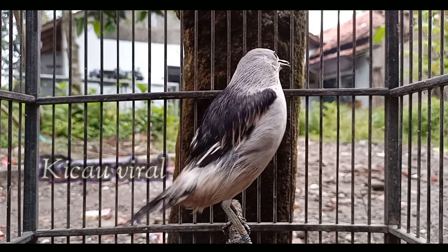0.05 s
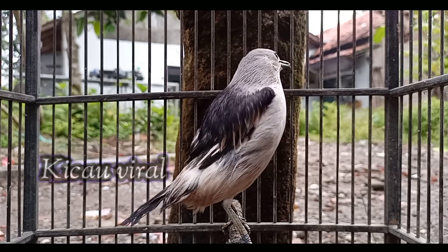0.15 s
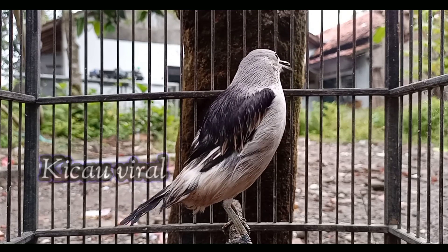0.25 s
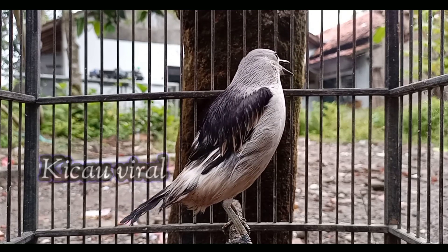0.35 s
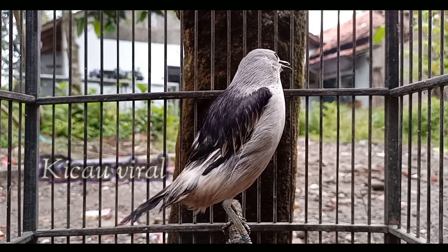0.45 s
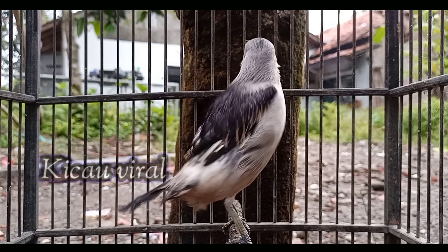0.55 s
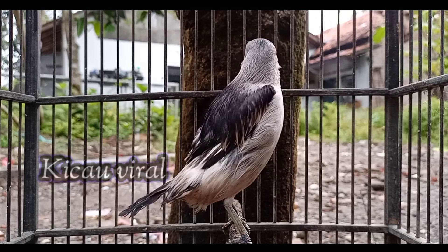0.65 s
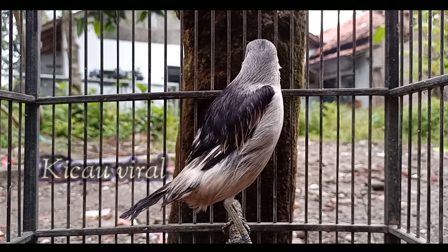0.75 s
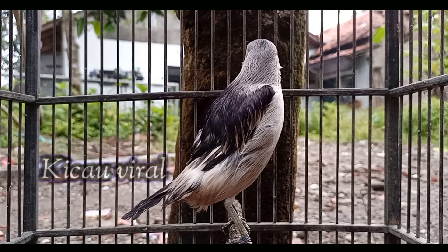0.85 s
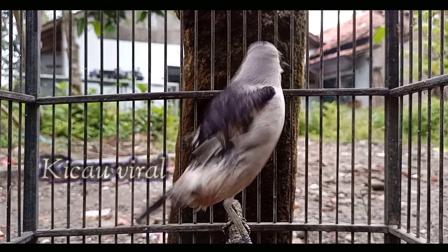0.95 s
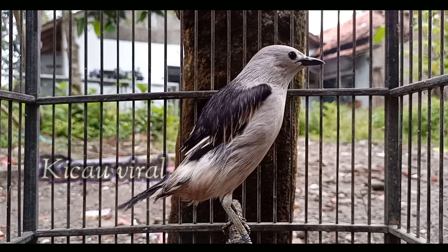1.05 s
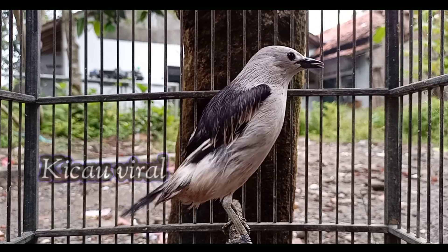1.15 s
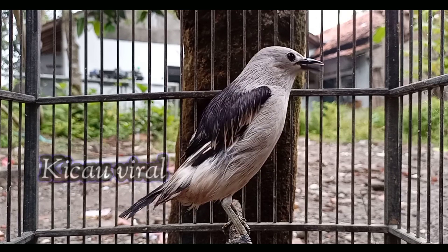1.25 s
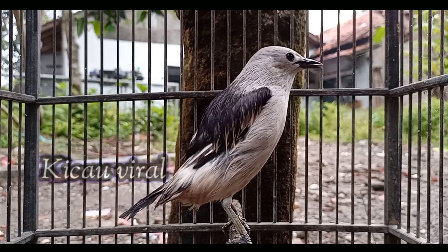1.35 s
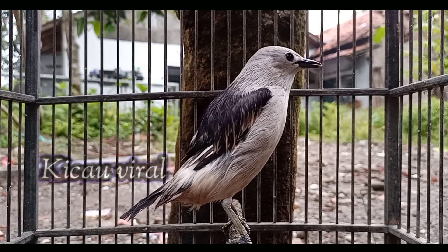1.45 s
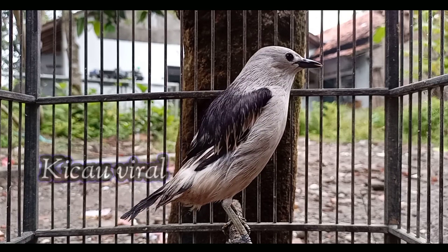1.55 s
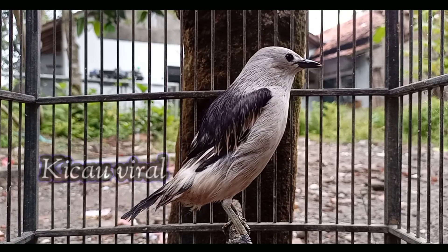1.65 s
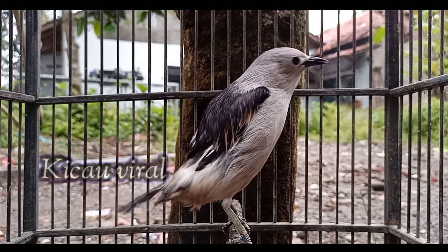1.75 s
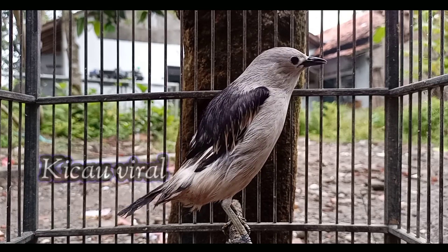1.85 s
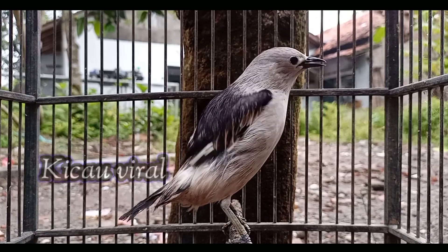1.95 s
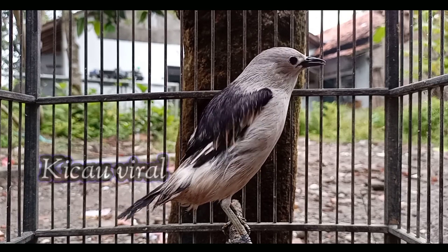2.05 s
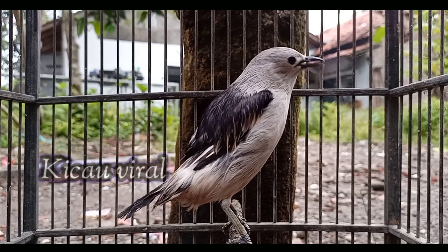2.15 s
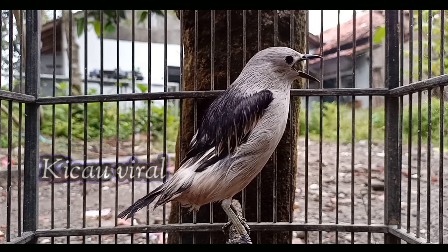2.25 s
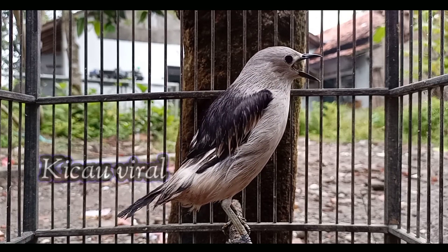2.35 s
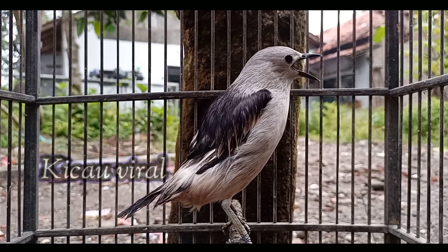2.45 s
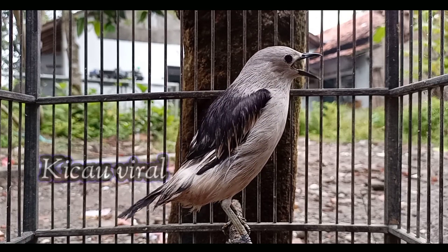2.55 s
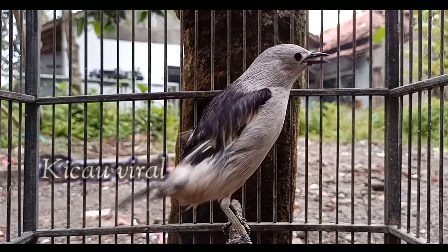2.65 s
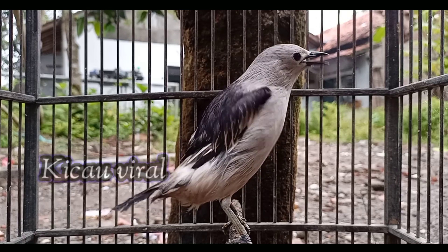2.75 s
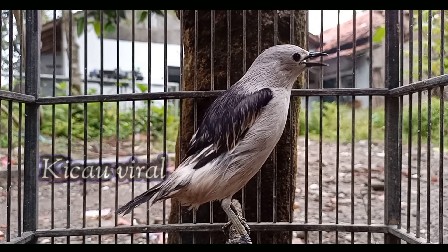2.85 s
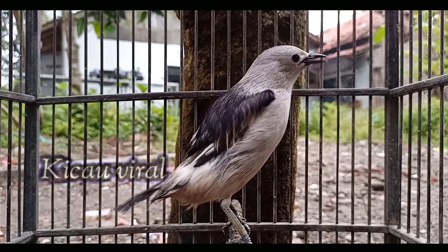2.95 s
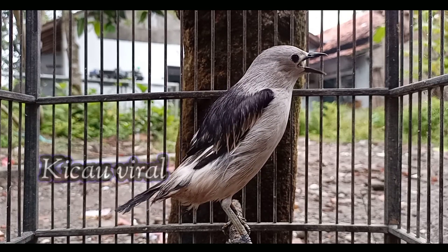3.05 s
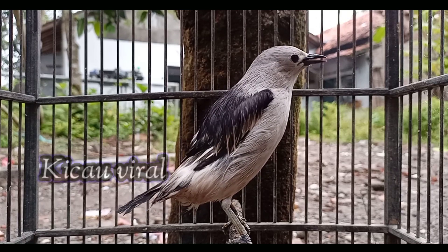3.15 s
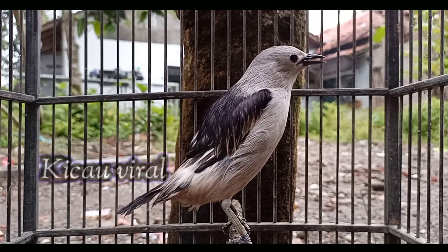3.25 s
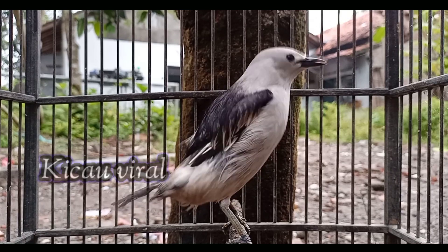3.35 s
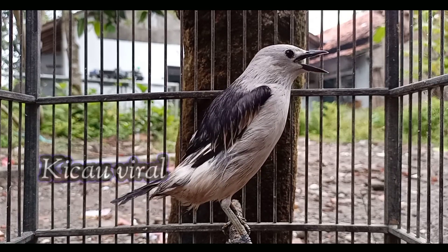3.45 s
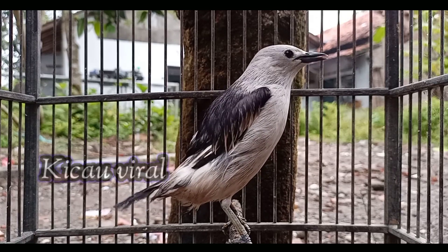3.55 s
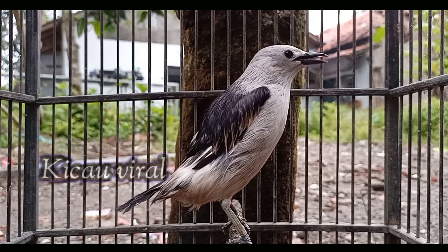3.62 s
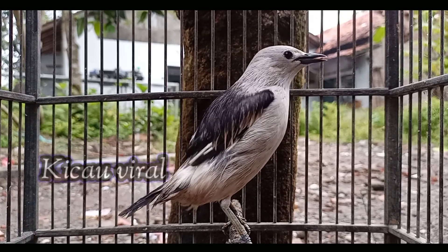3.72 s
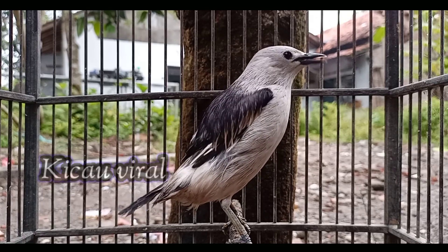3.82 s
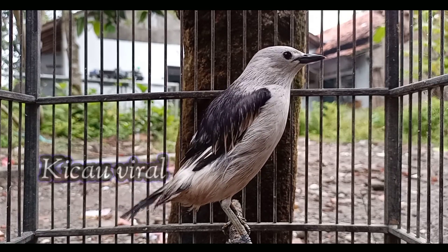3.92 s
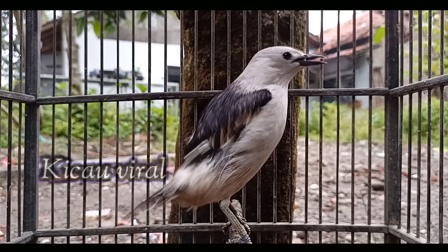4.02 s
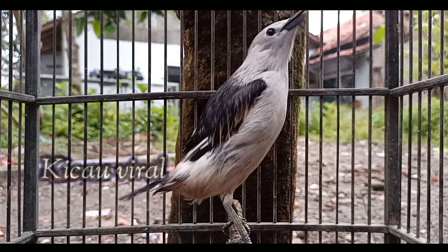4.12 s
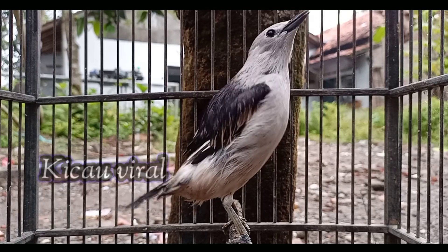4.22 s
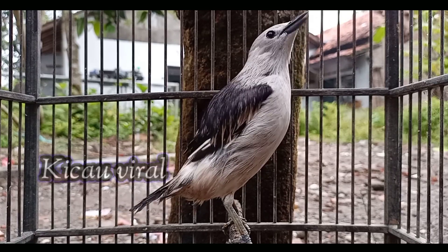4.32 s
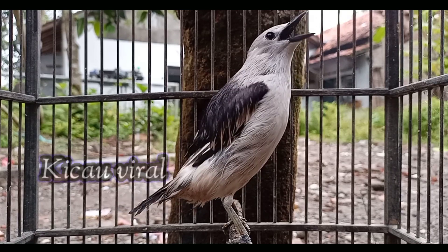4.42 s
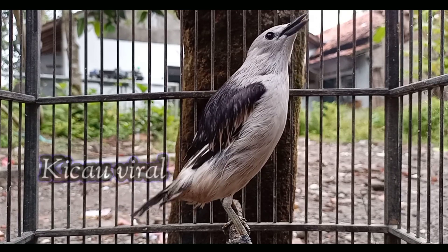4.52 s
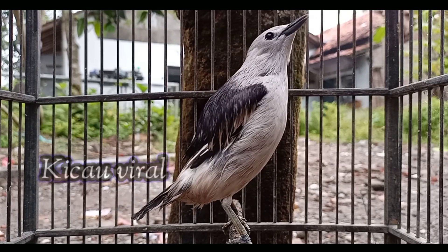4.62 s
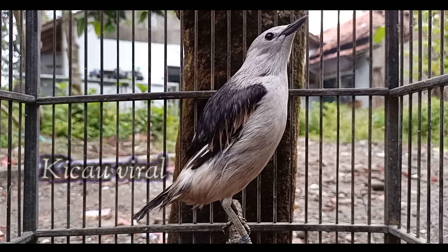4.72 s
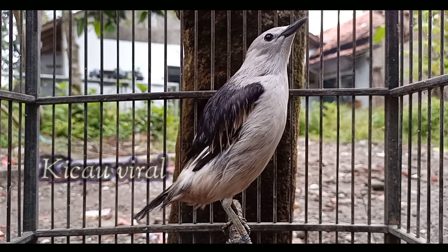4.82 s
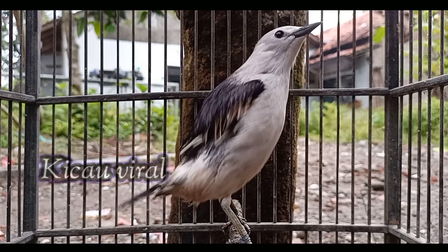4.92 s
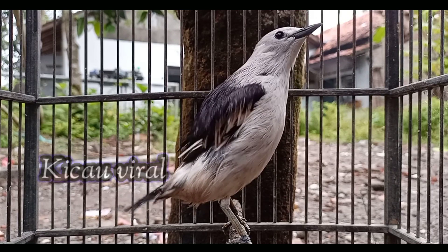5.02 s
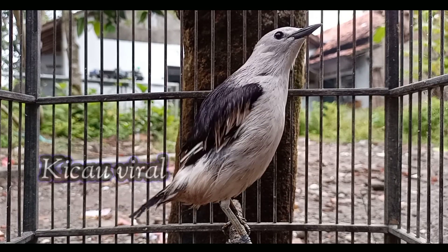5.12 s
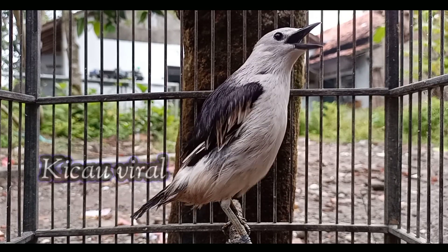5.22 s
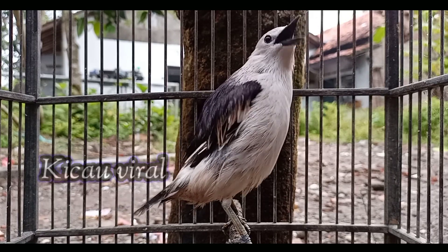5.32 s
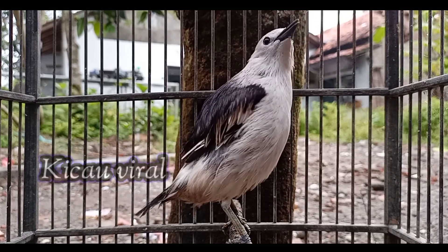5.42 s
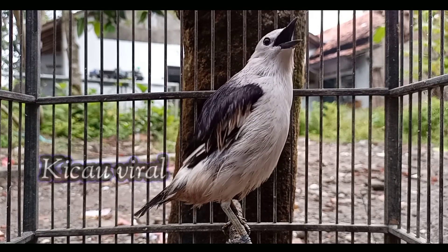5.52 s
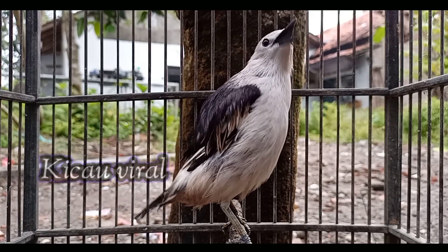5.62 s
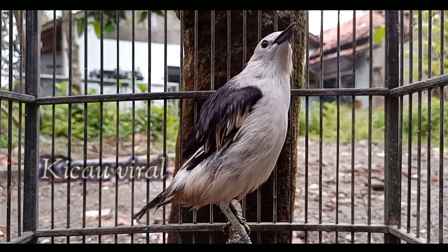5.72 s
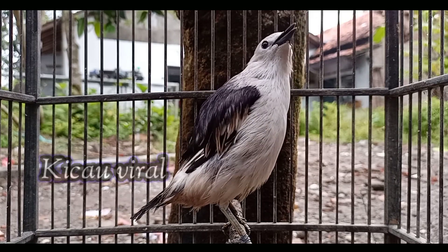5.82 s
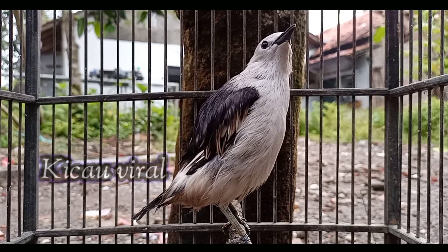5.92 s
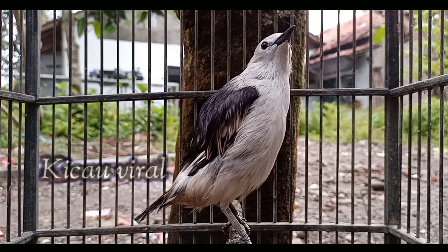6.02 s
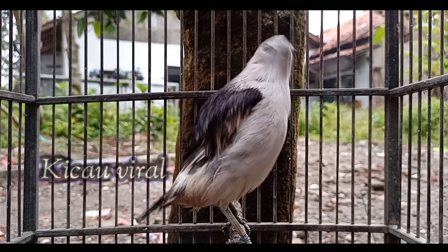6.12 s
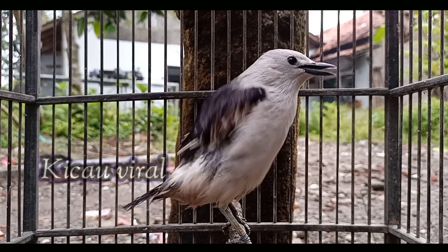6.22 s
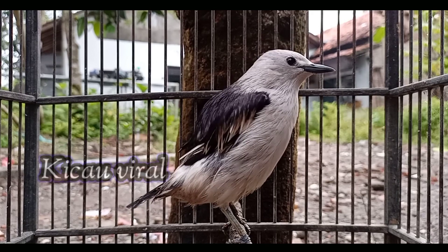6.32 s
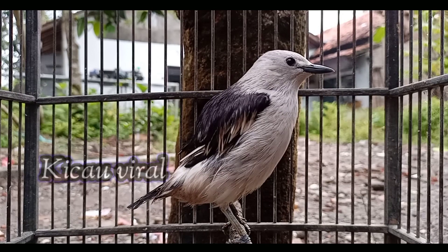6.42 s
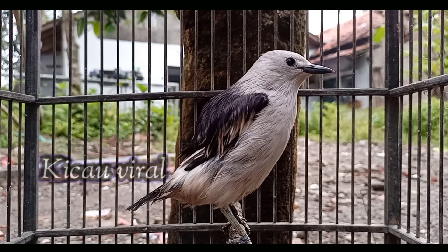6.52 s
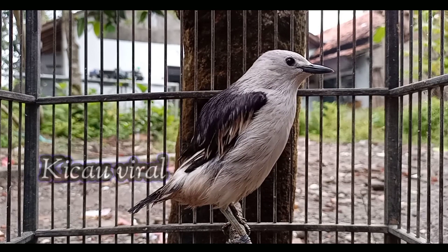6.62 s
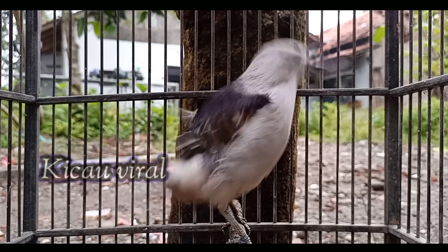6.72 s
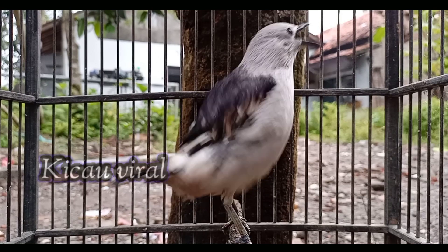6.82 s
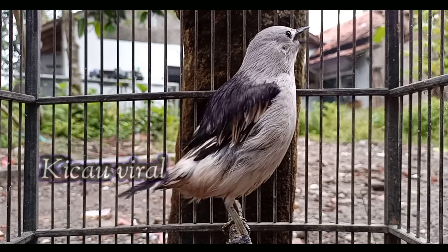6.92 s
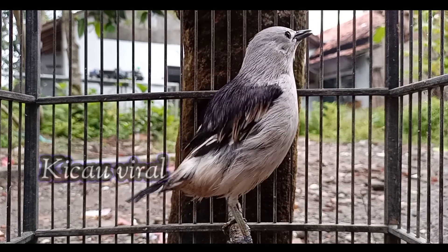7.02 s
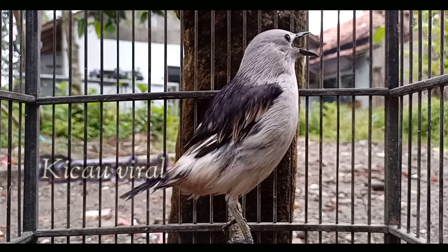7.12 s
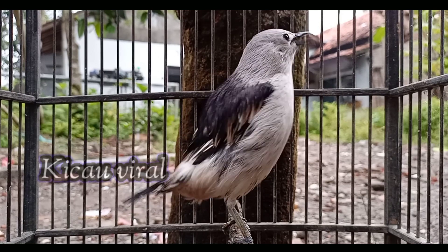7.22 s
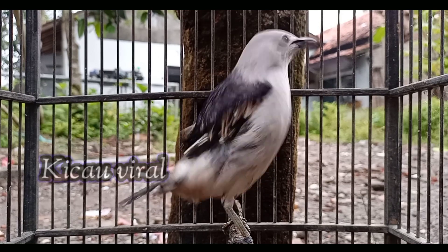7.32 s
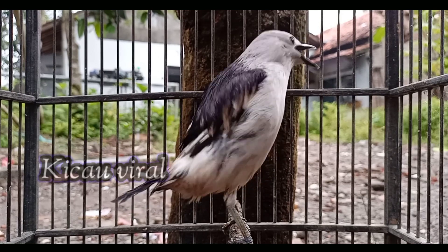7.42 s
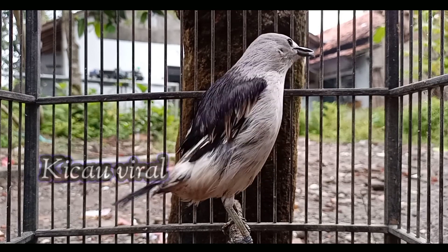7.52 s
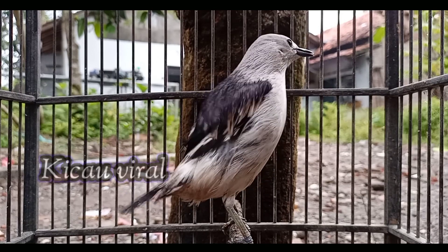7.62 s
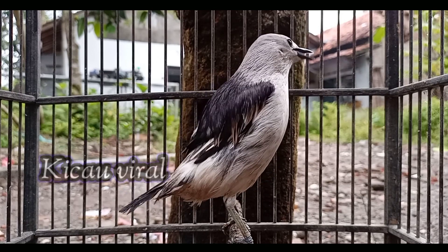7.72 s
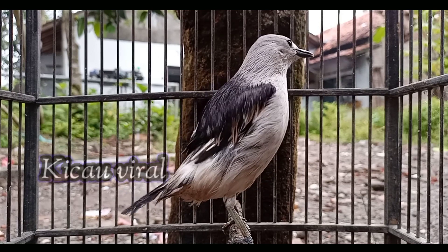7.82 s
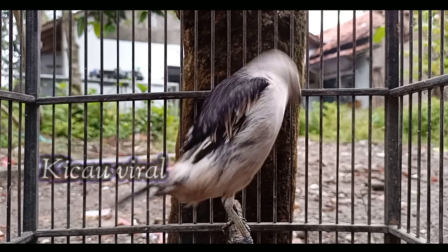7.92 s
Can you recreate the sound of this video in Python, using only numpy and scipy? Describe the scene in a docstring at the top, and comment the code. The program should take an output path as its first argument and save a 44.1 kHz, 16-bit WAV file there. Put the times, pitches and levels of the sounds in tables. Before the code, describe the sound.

A caged starling sings close by under a porch roof, with a short, light echo. For the first second it twitters rapidly in two overlapping tones. From 1.3 to 2 seconds, eight quick high-low pairs of chips step down in pitch. Gruff chirps lead into a harsh, throbbing rasp from 2.3 to 2.7 seconds. Two loud, high upward sweeps come near 3 seconds, then two longer quavering whistles until 3.8. Sharp snapping notes land at 3.9 and 4.2 seconds, and a squawk at 4.5. After a pause, three rising and falling mews run from 5.3 seconds, the last breaking into a rattling yelp at 6. Three harsh squawks follow between 7 and 7.6 seconds, then a few soft chirps. The beak ticks lightly now and then. Behind it all are faint piping and sliding whistles from distant birds, a thin insect hiss and a low outdoor rumble.

```python
"""A starling under a porch roof

A caged starling sings close by. Air shakes two thin membranes in its voice box (the syrinx), and
its throat and beak shape the tone. The two sides twitter in duet, then it chips, growls, rasps,
whistles, squawks and mews. Nearby surfaces and the porch echo it; other birds, insects and a low
outdoor rumble lie behind."""
import sys
import numpy as np
from scipy import signal
from scipy.fft import rfft, irfft, next_fast_len
from scipy.io import wavfile
from scipy.ndimage import uniform_filter1d

SR = 44100
rng = np.random.default_rng(int(sys.argv[2]) if len(sys.argv) > 2 else 0)


def generate_wav(sig):
    """Save sig (samples, or channels by samples) to the path in sys.argv[1] as 16-bit PCM at SR."""
    pcm = np.round(np.clip(np.atleast_2d(sig).T, -1, 1) * 32767).astype(np.int16)
    wavfile.write(sys.argv[1], SR, pcm)


N = 351477
TIME = np.arange(N) / SR

# How the throat and beak boost or weaken each frequency, for two ways of singing: frequency_hz, gain_db
WHISTLE_THROAT = [(1000, -27.5), (2300, 7), (4200, 7), (6400, 2.5), (7500, -11.5), (10600, -15),
                  (13000, -36.5), (15500, -30)]
SQUAWK_THROAT = [(1000, -34.5), (1600, -21), (2300, -10), (3200, -4.5), (4200, 5.5), (5300, 5.5), (6400, 0),
                 (7500, -3), (8700, -3.5), (10200, -9), (13000, -25.5), (15500, -15.5)]


def undb(db):
    """Turn decibels into a gain to multiply by."""
    return 10 ** (np.asarray(db) / 20)


def unit(x):
    """Scale a signal so that its average level (rms) is 1."""
    return x / np.sqrt(np.mean(x ** 2))


def gain_at(hz, spectrum):
    """Read the gain at any frequency from rows of frequency_hz, gain_db."""
    points, db = np.transpose(spectrum)
    return undb(np.interp(np.log(hz + 1), np.log(points), db))


def colour(x, spectrum):
    """Filter a signal by a spectrum, then scale it to level 1."""
    size = next_fast_len(len(x))
    bin_hz = np.arange(size // 2 + 1) * SR / size
    return unit(irfft(rfft(x, size) * gain_at(bin_hz, spectrum), size)[:len(x)])


def noise_band(count, hz, width_hz):
    """Noise around one frequency; around 0 Hz it is a random wobble."""
    size = next_fast_len(count + 4096)
    bin_hz = np.arange(size // 2 + 1) * SR / size
    bell = np.exp(-((bin_hz - hz) / width_hz) ** 2)
    return unit(irfft(rfft(rng.standard_normal(size)) * bell, size))[:count]


def swell(curve):
    """A gain that follows rows of time_s, level_db and is silent outside them."""
    return undb(np.interp(TIME, *np.transpose(curve), left=-np.inf, right=-np.inf))


# A note is a list of points: time_s, pitch_hz, level_db, slope_db_per_octave, roughness.
# A higher slope makes the overtones brighter; roughness runs from 0 (pure) to 1 (harsh).
def chirp(start_s, rise_s, length_s, start_hz, knee_hz, end_hz, level_db, slope=0, roughness=0,
          onset_db=-14, fade_db=-8):
    """A note that swells as it slides to a turning point (the knee), then drifts, fades and smooths."""
    return np.array([(start_s, start_hz, level_db + onset_db, slope, roughness),
                     (start_s + rise_s, knee_hz, level_db, slope, roughness),
                     (start_s + length_s, end_hz, level_db + fade_db, slope, roughness * 0.63)])


# A call shape has the columns: position, pitch_ratio, level_db, slope_db_per_octave, roughness.
# Position is -1 at the start, 0 at the accent and 1 at the end.
def call(shape, accent_s, before_s, after_s, pitch_hz, level_db, lead_db=0, fall=1):
    """Stretch a shape into a note; lead_db is added before the accent, fall scales the bend after it."""
    position, ratio, shape_db, slope, roughness = np.transpose(shape)
    lead = position < 0
    times = accent_s + position * np.where(lead, before_s, after_s)
    pitches = pitch_hz * ratio ** np.where(lead, 1, fall)
    return np.transpose([times, pitches, level_db + shape_db + lead_db * lead, slope, roughness])


def glide(note, edge_s=0.0018):
    """Join a note's points smoothly: gives its sample numbers, strength and (pitch, slope, roughness)."""
    times, hz, db, *others = np.transpose(note)
    span = np.flatnonzero((TIME > times[0] - edge_s) & (TIME < times[-1] + edge_s))
    t = TIME[span]
    inside_s = np.minimum(t - times[0], times[-1] - t)
    gate = np.sin(np.pi / 2 * np.clip((inside_s + edge_s) / (2 * edge_s), 0, 1)) ** 2
    curves = [np.interp(t, np.sort(times), column) for column in (undb(db / 2), hz, *others)]
    root_strength, *controls = (uniform_filter1d(curve, size=130, mode="nearest") for curve in curves)
    return span, gate * root_strength ** 2, controls


def reverb(x, decay_s, build_s):
    """Countless echoes blur into a tail that builds up, then dies by 60 dB in decay_s."""
    t = TIME[:SR]
    tail = rng.standard_normal(SR) * (1 - np.exp(-t / build_s)) * np.exp(-np.log(1000) * t / decay_s)
    tail = colour(tail, [(6000, 7), (14000, -6.0)]) / np.sqrt(SR)
    return signal.fftconvolve(x, tail)[:N]


def outdoors(rumble_db=-59.5):
    """A wavering rumble, a thin insect hiss, and a soft wash of noise that swells once."""
    # Tone of the rumble and the wash: frequency_hz, gain_db
    rumble_spectrum = [(30, -40.5), (80, 3.5), (170, 7), (330, -12), (600, -21.5), (1100, -27.5),
                       (5000, -32.5), (15000, -52)]
    wash_spectrum = [(50, -11.5), (150, 7), (550, 2), (1000, -4), (1600, -1.5), (3000, -9.5), (6000, -18),
                     (9000, -37)]
    # Loudness of the wash and the insects: time_s, level_db
    wash_levels = [(1.2, -74), (1.8, -53.5), (2.7, -57), (3.2, -62.5), (4.4, -72.5), (5, -111)]
    insect_levels = [(0, -75.5), (2.3, -70), (2.8, -84.5), (5, -88.5), (6.2, -81), (8, -78)]
    rumble = colour(rng.standard_normal(N), rumble_spectrum) * undb(rumble_db + 0.39 * noise_band(N, 0, 4))
    insects = noise_band(N, 9310, 360) * swell(insect_levels) * undb(2.4 * noise_band(N, 0, 16))
    wash = colour(rng.standard_normal(N), wash_spectrum) * swell(wash_levels)
    return rumble + insects + wash


def far_swells():
    """Faint bands of noise come and go in the distance."""
    # One swell a row: middle_s, half_length_s, centre_hz, half_width_hz, level_db
    swells = [ (0.106, 0.15, 418, 75, -70), (0.647, 0.12, 398, 51, -65), (1.994, 0.37, 675, 14, -62.5),
              (2.3, 0.54, 505, 14, -62.5), (3, 0.29, 623, 47, -63), (3.62, .2, 1395, 350, -65),
              (3.95, 0.2, 765, 105, -70.5), (4.301, 0.23, 401, 55, -62), (4.751, .25, 332, 15.6, -64.5),
              (5.252, 0.4, 622, 39, -74), (5.757, 0.17, 224.6, 9.2, -62.5), (6.545, 0.17, 248, 12.7, -63),
              (6.553, 0.55, 885, 10.5, -77), (7.354, 0.14, 243, 15, -63.5), (7.85, 0.13, 516, 43, -69.5),
              (4.43, 0.11, 5080, 2200, -56), (6.881, .06, 4840, 970, -56.5), ]
    out = np.zeros(N)
    for middle_s, half_s, hz, width_hz, db in swells:
        span = np.flatnonzero(np.abs(TIME - middle_s) < 2 * half_s)
        strength = undb(db) * np.exp(-((TIME[span] - middle_s) / half_s) ** 2)
        out[span] += strength * noise_band(len(span), hz, width_hz)
    return out


def far_birds(pipes_per_s=11.2, piping_hz=2570, rise=.08, waver=.024, bout_edge_s=.12):
    """Distant birds sing runs of short rising pipes, no two quite alike, and pure sliding whistles."""
    # Runs of piping: start_s, end_s, level_db
    bouts = [(0, 0.857, -59.5), (3.097, 3.93, -55.5), (4.298, 5.189, -57), (5.665, 6.434, -53.5)]
    # Sliding whistles: start_s, rise_s, length_s, start_hz, knee_hz, end_hz, level_db
    slurs = [(1.797, 0.033, 0.081, 6800, 6390, 5160, -41.5), (2.004, 0.03, 0.12, 6700, 6850, 5140, -37.5),
             (6.528, 0.093, .14, 3894, 4005, 3420, -45)]
    cycle = pipes_per_s * TIME % 1
    bend = 1 + rise * np.sqrt(cycle) + waver * noise_band(N, 0, 280) + 0.0071 * noise_band(N, 0, 1.4)
    bout_gain = sum(undb(db) * np.clip(np.minimum(TIME - start, end - TIME) / bout_edge_s, 0, 1)
                    for start, end, db in bouts)
    pipe_gain = 2 * np.sin(np.pi * cycle) ** 2 * undb(2 * noise_band(N, 0, 8.8))
    out = bout_gain * pipe_gain * np.sin(2 * np.pi * np.cumsum(piping_hz * bend) / SR)
    for row in slurs:
        span, strength, (hz, *_) = glide(chirp(*row, onset_db=-31.5, fade_db=-6.5), edge_s=0.0043)
        out[span] += strength * np.sqrt(2) * np.sin(2 * np.pi * np.cumsum(hz) / SR)
    return out


def porch(song):
    """Nearby surfaces throw the song back, and the porch adds a short and a longer tail."""
    # Single echoes: delay_s, gain_db
    bounces = [(.0031, -19), (.0074, -25), (0.0147, -19.5)]
    echoes = sum(undb(db) * np.interp(TIME - delay_s, TIME, song, left=0) for delay_s, db in bounces)
    short_tail = undb(-8.5) * reverb(song, decay_s=0.061, build_s=0.0015)
    long_tail = undb(-25) * reverb(song, decay_s=0.31, build_s=.015)
    return echoes + short_tail + long_tail


def beak(decay_s=0.0033):
    """The beak ticks: dry, bright bursts of noise that die at once."""
    # One tick a row: start_s, level_db
    ticks = [(1.272, -43), (4.881, -69.5), (6.235, -62.5), (6.927, -41.5), (7.215, -45), (7.759, -43.5)]
    strength = sum(undb(db) * (TIME >= s) * np.exp(-np.abs(TIME - s) / decay_s) for s, db in ticks)
    return strength * colour(rng.standard_normal(N), [(1500, -23), (4000, -7), (8500, 15.5), (12000, -26)])


def syrinx(notes, throat, jitter, flutter, split, hiss_db, shake_hz):
    """One membrane sings through the throat. Roughness shakes its pitch (jitter) and strength
    (flutter), makes every other cycle unequal (split) and adds the hiss of air."""
    out = np.zeros(N)
    air = colour(rng.standard_normal(N), throat)
    multiples = np.arange(1, 25)[:, None] / 2  # of the pitch: 0.5, 1, 1.5 ...
    for note in notes:
        span, strength, (hz, slope, roughness) = glide(note)
        roughness = np.clip(roughness, 0, 1)
        shaken_hz = hz * (1 + jitter * roughness * noise_band(len(hz), 0, shake_hz))
        phase = 2 * np.pi * np.cumsum(shaken_hz) / SR
        tilt = undb(slope * np.log2(np.maximum(multiples, 1)))
        gains = gain_at(multiples * hz, throat) * tilt * (multiples * hz < SR / 2)
        gains[::2] *= split * roughness ** 2  # unequal cycles add tones halfway between the harmonics
        # the throat delays each tone differently, which blunts the peaks
        shifts = rng.uniform(0, 2 * np.pi, multiples.shape)
        tone = (gains * np.sin(multiples * phase + shifts)).sum(0) / np.sqrt((gains ** 2).sum(0) / 2)
        tone *= 1 + flutter * roughness * noise_band(len(hz), 0, shake_hz)
        out[span] += strength * (tone + undb(hiss_db) * roughness * air[span])
    return out


def twitter():
    """Both membranes sing a duet; where they overlap, each shakes the other and adds new tones."""
    # The lower voice, and the upper one that sinks from note to note:
    # start_s, rise_s, length_s, start_hz, knee_hz, end_hz, level_db, slope_db_per_octave, roughness
    low_chirps = [ (0, 0.001, 0.03, 1790, 1763, 1750, -29.5, -16, 0.54),
                  (.04, 0.017, 0.019, 1498, 2413, 2160, -26, -9, 0.33),
                  (.06, 0.0045, 0.049, 2177, 2240, 2135, -30.5, -11.5, 0.3),
                  (0.175, 0.014, 0.032, 1135, 1597, 1810, -39.5, -26.5, .25),
                  (.195, 0.0093, 0.066, 1760, 2020, 1860, -26, -12, 0.37),
                  (0.269, 0.031, 0.069, 1745, 2687, 2390, -31, -3.5, 0.29),
                  (.37, 0.021, 0.072, 2480, 3070, 3336, -33.5, 2.5, 0.33),
                  (0.459, 0.028, .05, 3200, 3200, 3380, -30.5, 3.5, 0.24),
                  (.505, 0.023, 0.029, 3450, 3640, 3620, -41, 3, 0.25),
                  (0.555, 0.017, 0.037, 3000, 3335, 3390, -35, -3.5, .28),
                  (0.658, 0.02, 0.024, 2750, 3350, 3800, -36, -8, 0.2),
                  (0.736, .015, 0.025, 2780, 3295, 3780, -37, -10.5, 0.5),
                  (0.814, 0.017, 0.045, 2986, 3325, 3650, -37, -11.5, 0.38),
                  (0.908, 0.038, 0.069, 2900, 3340, 2895, -31.5, -10.5, 0.21),
                  (7.755, 0.016, 0.083, 3376, 3424, 3110, -37.5, -11, 0.09),
                  (7.819, .012, 0.029, 1605, 1549, 1500, -35, -22, 0.02),
                  (7.846, .008, 0.029, 1720, 1705, 1660, -45, -15, 0.72), ]
    high_chirps = [ (.288, 0.029, 0.085, 5420, 4815, 4670, -34, 4, 0.13),
                   (.378, 0.017, .072, 5240, 5390, 5040, -31.5, 9.5, 0.22),
                   (0.472, 0.028, 0.098, 4900, 4920, 4490, -30.5, 2.5, 0.095),
                   (.558, 0.022, 0.037, 4497, 4600, 4485, -25.5, -6, 0.1),
                   (0.658, .034, .083, 3960, 3953, 3710, -30, -2.5, 0.13),
                   (.745, 0.021, 0.064, 3750, 3780, 3730, -27, -7, 0.048),
                   (.83, 0.027, 0.071, 3660, 3560, 3470, -33, -5.5, 0.15), ]
    # Throat and beak for the lower voice: frequency_hz, gain_db
    throat = [(1000, -38.5), (1600, -51), (2300, -13), (3200, -13), (4200, 7), (5300, -12.5), (6400, -2),
              (7500, -12.5), (8700, -15.5), (10200, -13), (13000, -52), (15500, -36)]
    low = syrinx([chirp(*row, onset_db=-17, fade_db=-11.5) for row in low_chirps], throat,
                 jitter=0.057, flutter=1.0, split=.2, hiss_db=-7.0, shake_hz=402)
    high = syrinx([chirp(*row, onset_db=-12, fade_db=-9) for row in high_chirps], WHISTLE_THROAT,
                  jitter=0.12, flutter=1.0, split=0, hiss_db=-10.5, shake_hz=400)
    return low + high + 0.55 * low * high


def chips(rise_s=.009, upper_hold_s=.019, lower_hold_s=.023):
    """Quick high-low pairs of notes step down in pitch."""
    # One pair a row: accent_s, upper_hz, upper_db, lower_lag_s, lower_hz, lower_db
    pairs = [ (1.277, 4610, -36.5, 0.043, 3110, -34), (1.372, 4060, -27, 0.037, 2720, -27.5),
             (1.459, 3866, -29.5, .038, 2600, -26), (1.546, 3778, -28.5, 0.04, 2520, -27),
             (1.639, 3520, -32, 0.039, 2475, -28), (1.738, 2670, -30, 0.043, 2210, -35),
             (1.846, 2578, -28.5, 0.037, 2374, -30.5), (1.957, 2460, -28.5, 0.043, 2304, -31.5), ]
    # Call shapes of the two chips: position, pitch_ratio, level_db, slope_db_per_octave, roughness
    upper_shape = [(-1, .8, -11.5, -21, 0.4), (-.5, .9, -7, -21, 0.5), (0, 0.97, 0.5, -33, 0.5),
                   (0.27, .96, -3.5, -29.5, .25), (1, .93, -6.5, -25, 0.53)]
    lower_shape = [(-1, .61, -16, -30.5, .15), (-.35, 0.88, -12, -25.5, 0.16), (0, 0.97, 2.5, -32, 0.37),
                   (0.46, .94, -4.5, -24.5, 0.22), (-0.15, 1, -12, -25, 0.21), (0.93, 0.89, -2, -26, .15)]
    notes = [call(upper_shape, s, rise_s, upper_hold_s, hz, db) for s, hz, db, *_ in pairs]
    notes += [call(lower_shape, s + lag, rise_s, lower_hold_s, hz, db) for s, _, _, lag, hz, db in pairs]
    return syrinx(notes, WHISTLE_THROAT, jitter=.035, flutter=1.1, split=0, hiss_db=-14, shake_hz=350)


def growls():
    """Gruff low chirps come before the rasp and under the start of each whistle."""
    # One growl a row:
    # start_s, rise_s, length_s, start_hz, knee_hz, end_hz, level_db, slope_db_per_octave, roughness
    gruff_chirps = [ (2.135, 0.0066, 0.019, 1410, 1580, 1326, -36, -22, .2),
                    (2.157, .019, 0.047, 1340, 1896, 1505, -33, -19.5, 0.18),
                    (2.198, 0.011, .021, 1470, 2287, 1800, -32.5, -18.5, 0.96),
                    (2.221, 0.0089, 0.091, 1563, 1790, 1590, -41.5, -16.5, 1),
                    (2.234, 0.0061, 0.062, 3720, 3640, 4670, -39.5, -30, 0.31),
                    (2.763, .039, 0.058, 1049, 2695, 2600, -39, 2, .4),
                    (2.929, .034, .06, 1203, 2783, 2670, -40, 4, 0.37),
                    (3.075, 0.041, 0.034, 1150, 1850, 1930, -35.5, 7, .5),
                    (3.467, 0.042, 0.034, 1325, 1945, 2090, -38.5, 2, 1), ]
    notes = [chirp(*row, onset_db=-13, fade_db=-1.5) for row in gruff_chirps]
    return syrinx(notes, WHISTLE_THROAT, jitter=.035, flutter=.9, split=.3, hiss_db=-16, shake_hz=400)


def rasp(throb_hz=35.5, air_throb=0.73):
    """Both membranes rattle wildly, their pitch arching with each throb of the syrinx muscles."""
    # How hard the bird pushes: time_s, level_db
    effort = [(2.292, -54.5), (2.31, -32), (2.345, -26), (2.42, -29.5), (2.6, -30), (2.68, -32),
              (2.697, -57)]
    # Throat and beak while rasping: frequency_hz, gain_db
    throat = [(530, -93), (900, -42.5), (1560, -18), (2050, -81.5), (2760, -14), (3030, -5), (4880, 1),
              (5840, -12.5), (6500, -3.5), (7150, -10.5), (8860, -11.5), (10300, -30), (11400, -20),
              (13600, -42), (15500, -24)]
    cycle = throb_hz * (TIME - 2.677)  # a throb peaks at 2.677 s
    beat = np.cos(2 * np.pi * cycle)
    low_hz = 2380 + 540 * np.abs(np.cos(np.pi * cycle + 1)) + 60 * noise_band(N, 0, 400)
    high_hz = 4750 - 650 * beat + 220 * noise_band(N, 0, 600)
    low, high = (np.sin(2 * np.pi * np.cumsum(hz) / SR) * (1 + .5 * noise_band(N, 0, 300))
                 for hz in (low_hz, high_hz))
    # toward the end the throbs deepen and the upper membrane flares on each
    start_s, end_s = effort[0][0], effort[-1][0]
    depth = np.clip((TIME - start_s) / (end_s - start_s), 0, .9) ** 4
    flare = 1 + 7.5 * depth * np.maximum(beat, 0) ** 4
    # the air escapes in fine, uneven pulses
    pulse_hz = 300 * (1 + .35 * noise_band(N, 0, 150))
    pulses = 1 + .35 * np.cos(2 * np.pi * np.cumsum(pulse_hz) / SR)
    air = colour(rng.standard_normal(N), throat) * pulses * (1 + air_throb * depth * beat)
    return swell(effort) * (.72 * air + .57 * low + .58 * high * flare)


def whistles():
    """Two quick upward sweeps, then two long whistles that quaver, sag and flip up to a pure top."""
    # Call shapes of both kinds: position, pitch_ratio, level_db, slope_db_per_octave, roughness
    sweep_shape = [(-0.9, .74, -15.5, -30.5, .8), (-.46, .91, -12, -12.5, .8), (0, 1, 0, -6, 0.22),
                   (0.64, 1.04, -9.5, -17, 0.054), (1, 1.03, -29.5, -19, 0.11)]
    whistle_shape = [(-1, .7, 0, 4.5, .4), (-.9, .825, 2, -5, 0.99), (-.78, 0.84, 4.5, -10, 0.39),
                     (-.47, .818, -3, -10.5, .3), (-.26, .785, -12.5, -14, .3),
                     (-0.093, .87, -17, -0.5, .55), (0, 1, -2, -19.5, .2), (.36, 1.058, 0.5, -45.5, .03),
                     (0.81, 1.05, -4.5, -41, .03), (1, 1.016, -23, -29, .03)]
    # The sweeps: accent_s, before_s, after_s, pitch_hz, level_db
    sweeps = [(2.84, .047, .043, 6337, -18.5), (3.002, .05, 0.027, 6335, -19.5)]
    # The long whistles: accent_s, before_s, after_s, pitch_hz, level_db, lead_db
    long_whistles = [(3.318, .168, 0.074, 6290, -26, 0.5), (3.724, .178, 0.061, 6238, -27.5, 5)]
    # A bright tone, like an overtone of the growl, rings at the start of each long whistle: start_s, rise_s,
    # length_s, start_hz, knee_hz, end_hz, level_db, slope_db_per_octave, roughness
    openers = [ (3.085, 0.024, 0.056, 4020, 4380, 4247, -26.5, 6.5, 0.28),
               (3.49, 0.026, 0.05, 3850, 4070, 3923, -23.5, 0, 0.16), ]
    notes = [call(sweep_shape, *row) for row in sweeps]
    notes += [call(whistle_shape, *row) for row in long_whistles]
    notes += [chirp(*row, onset_db=-17, fade_db=-3) for row in openers]
    return syrinx(notes, WHISTLE_THROAT, jitter=0.043, flutter=0.57, split=0, hiss_db=-44.5, shake_hz=547)


def squawks():
    """Clean notes break up: a snap cracks and drops at once, a squawk makes a harsh arch."""
    # Call shapes of both kinds: position, pitch_ratio, level_db, slope_db_per_octave, roughness
    snap_shape = [(-1, .9, -23.5, -12.5, 0.099), (-.55, 1, -9.5, 3, 0.14), (-0.38, 1.01, -9, -1, 0.0558),
                  (-0.061, .98, -3.5, -7, 0.071), (0.154, .9, 1, -5, 0.54), (0.497, .86, -7, -9, 0.71),
                  (0.79, .78, -3, -10.5, 0.51)]
    squawk_shape = [(-1, .845, -31.5, -21, .08), (-.62, .845, -16, -2, 0.097), (-.04, .91, -8, -6, 0.067),
                    (.02, 0.94, -1.5, -1, 0.64), (.28, 0.98, 0.5, -4.5, .6), (.55, .905, -8.5, -5, 0.93),
                    (.83, .85, -9, -10, 0.73), (0.93, .73, -14, -13, 0.7)]
    # The calls: accent_s, before_s, after_s, pitch_hz, level_db and, for squawks, lead_db
    snap_calls = [(3.919, .037, 0.01637, 1943, -23.5), (4.217, .047, 0.0165, 2036, -23)]
    squawk_calls = [ (4.536, 0.062, 0.087, 2187, -25.5, 3), (6.976, .049, .088, 2211, -24.5, 1),
                    (7.266, .052, 0.095, 2220, -26, 2), (7.515, .046, .098, 2257, -21, -5), ]
    notes = [call(snap_shape, *row) for row in snap_calls]
    notes += [call(squawk_shape, *row) for row in squawk_calls]
    return syrinx(notes, SQUAWK_THROAT, jitter=.019, flutter=.42, split=1.05, hiss_db=-9, shake_hz=300)


def rattle(start_s, hz, depth, crackle, unevenness=0.152):
    """A gain that tears a tone into fast, slightly uneven pulses, each with a burst of noise."""
    pulse_hz = hz * (1 + unevenness * noise_band(N, 0, 56))
    beat = np.cos(2 * np.pi * np.cumsum(pulse_hz) / SR)
    bursts = np.maximum(beat, 0) ** 2 * noise_band(N, 0, 1100)
    return 1 + (TIME > start_s) * (depth * beat + crackle * bursts)


def mews():
    """Three mews rise and fall; the last breaks into pulses and ends in a yelp with the beak wide open."""
    # Call shape of a mew: position, pitch_ratio, level_db, slope_db_per_octave, roughness
    mew_shape = [(-1, .73, -27, -20.5, 0.061), (-0.74, .82, -6, -13, 0.068), (0, 1, 1, -10, 0.22),
                 (.24, .92, -1, -9.5, 0.24), (.52, .82, 0, -9, 0.03), (1, .71, -24, -14, 0.26)]
    # The mews: accent_s, before_s, after_s, pitch_hz, level_db, lead_db, fall (0 to 1)
    mew_calls = [ (5.352, .049, 0.12, 1439, -32.5, 0.5, 0.97),
                 (5.628, 0.052, 0.12, 1425, -32.5, -0.5, 0.94), (5.862, .031, 0.095, 1685, -35, -4, .26), ]
    # Throat and beak while mewing: frequency_hz, gain_db
    throat = [(1000, -27.5), (1600, -16.5), (2300, -4.5), (3200, -6), (4200, 2), (5300, 5.5), (6400, 6),
              (7500, 10), (8700, -2), (10200, -3), (13000, -36), (15500, -8)]
    # The yelp: time_s, pitch_hz, level_db, slope_db_per_octave, roughness
    yelp_note = [(5.944, 1930, -47, -10, 0.31), (5.955, 2140, -23.5, -13.5, 0.25),
                 (5.963, 1963, -34, -10, 0.42), (5.99, 1984, -34.5, -10, 0.46),
                 (6.024, 1947, -50.5, -15, 0.34)]
    notes = [call(mew_shape, *row) for row in mew_calls]
    mewing = syrinx(notes, throat, jitter=.06, flutter=1.4, split=.25, hiss_db=-13, shake_hz=330)
    yelp = syrinx([yelp_note], SQUAWK_THROAT, jitter=.05, flutter=.6, split=.2, hiss_db=-13, shake_hz=300)
    voice = (mewing + yelp) * rattle(start_s=5.857, hz=100, depth=.3, crackle=.45)
    # nothing of the mews sounds below about 950 Hz
    return signal.sosfilt(signal.butter(6, 950, "high", fs=SR, output="sos"), voice)


def scene():
    """The close starling and its porch echoes, over the sounds of the garden."""
    song = twitter() + chips() + growls() + whistles() + squawks() + mews() + rasp() + beak()
    echoes = porch(song)
    birds = far_birds()
    garden = undb(-4) * birds + undb(-7.5) * reverb(birds, decay_s=.45, build_s=0.0053)
    return (song + echoes + garden + far_swells() + outdoors())[None]


def record(dry, top_hz=15800):
    """The recorder cuts off the highest treble."""
    return signal.sosfilt(signal.ellip(10, .2, 80, top_hz, fs=SR, output="sos"), dry)


dry = scene()
out = record(dry)
generate_wav(out)
```